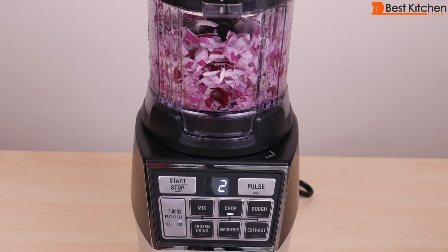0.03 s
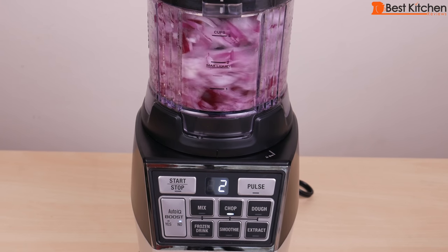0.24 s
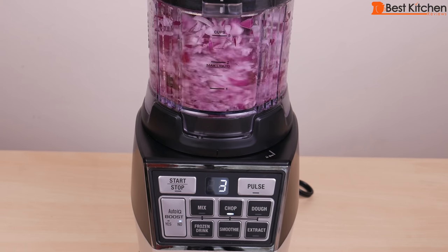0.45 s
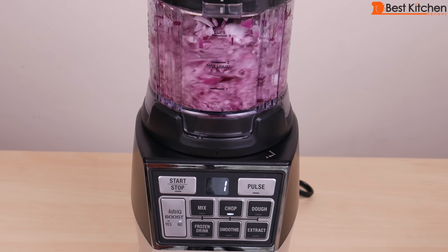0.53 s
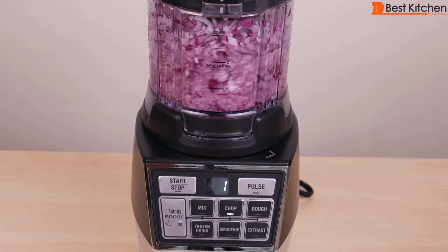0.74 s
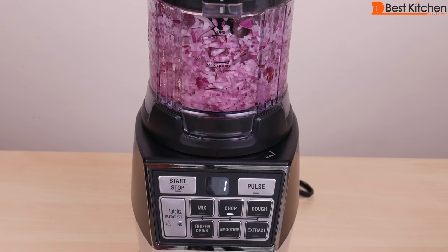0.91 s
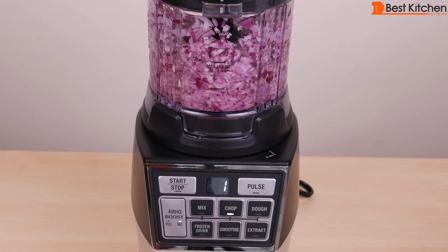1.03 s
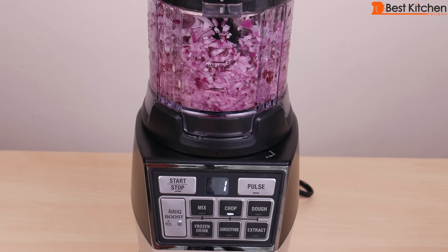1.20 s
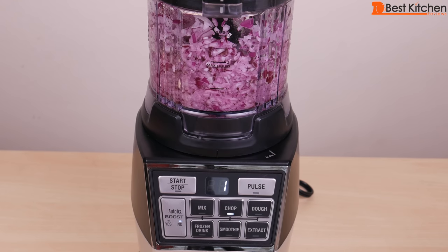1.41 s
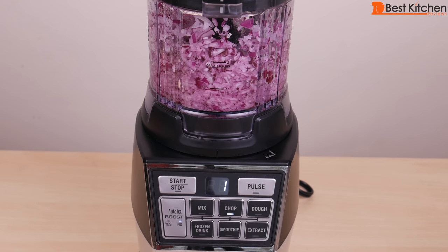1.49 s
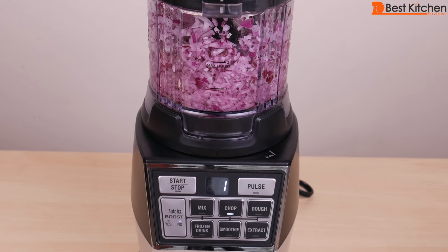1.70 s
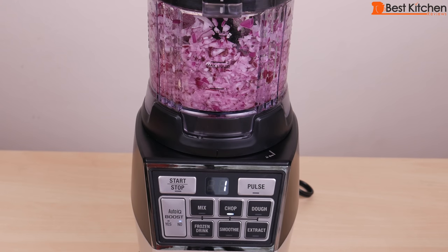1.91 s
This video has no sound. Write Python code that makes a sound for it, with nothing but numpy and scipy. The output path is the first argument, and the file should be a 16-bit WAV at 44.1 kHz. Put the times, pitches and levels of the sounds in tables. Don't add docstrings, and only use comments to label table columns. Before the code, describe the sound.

A kitchen blender makes one pulse. Quiet room air and faint hum, then small relay clicks at 0.18-0.23 seconds. The motor jolts on, big onion pieces thudding on plastic until 0.36; grinding, gear whine and a hail of small knocks peak in pitch near 0.57. It slows, hub ticking at 0.85, stops around 1.0; the base rings briefly in the hard kitchen, then near silence.

```python
import sys
import numpy as np
from scipy import signal
from scipy.fft import rfft, irfft, next_fast_len
from scipy.io import wavfile
from scipy.ndimage import uniform_filter1d, map_coordinates

SR = 44100
rng = np.random.default_rng(int(sys.argv[2]) if len(sys.argv) > 2 else 0)


def persist_wave(psi):
    counts = np.round(np.clip(psi, -1, 1) * 32767).astype(np.int16)
    wavfile.write(sys.argv[1], SR, np.atleast_2d(counts).T)


def nominal_scale(level):
    x = np.asarray(level, float) / 20
    return 10 ** x


N = 85995


def unit(x):
    return x / np.sqrt(np.mean(x ** 2) + 1e-20)


def along(points, hz):
    point_hz, value = np.transpose(points)
    return np.interp(np.log(hz + 1), np.log(point_hz + 1), value)


def wobble(rate):
    return map_coordinates(rng.standard_normal(4000), [np.arange(N) * rate / SR])


def filtered(x, response):
    m = next_fast_len(x.shape[-1] + SR // 2)
    spectrum = rfft(x, m) * response(np.fft.rfftfreq(m, 1 / SR))
    return irfft(spectrum, m)[..., :x.shape[-1]]


def peak(f, hz, width_hz):
    return 1j * f * width_hz / (hz * hz - f * f + 1j * f * width_hz)


def body(modes):
    return lambda f: sum((-1) ** k * nominal_scale(db) * peak(f, hz, width_hz)
                         for k, (hz, width_hz, db) in enumerate(modes))


def paired(pair, alike):
    def mix(hz):
        angle = np.arccos(np.clip(along(alike, hz), -1, 1)) / 2
        return np.array([np.cos(angle), np.sin(angle)])

    mid, side = filtered(pair, mix)
    return np.array([mid + side, mid - side])


def patchy(spectrum, patchy_db, channels=1):
    z = signal.stft(rng.standard_normal((channels, N)), nperseg=512)[2]
    field = uniform_filter1d(rng.standard_normal(z.shape[1:]), 5, 0)
    field = uniform_filter1d(field, 8, 1)
    x = signal.istft(z * nominal_scale(patchy_db * unit(field)), nperseg=512)[1][:, :N]
    return unit(filtered(x, lambda hz: nominal_scale(along(spectrum, hz))))


def bursts(rows):
    t = np.arange(N) / SR
    envelope = sum(nominal_scale(db - 60 * np.abs(t - s) / t60_s) * (t >= s) for s, db, t60_s in rows)
    return rng.standard_normal(N) * envelope


def running():
    # (time [s], shaft speed [Hz], effort [dB])
    motor_course = [
        (0.228, 118, -35.5),
        (.33, 146, -33),
        (0.421, 151.8, -31.5),
        (0.501, 172.9, -33.5),
        (.57, 177.5, -34.5),
        (0.719, 146.6, -33),
        (.84, 131.9, -31),
        (0.919, 114.6, -36.5),
        (0.989, 82.6, -45),
    ]
    on_s, rise_s, stop_s = .2305, 0.0016, 0.069
    t = np.arange(N) / SR
    s, hz, db = np.transpose(motor_course)
    gate = np.clip((t - on_s) / rise_s, 0, 1) * np.exp(-np.clip(t - s[-1], 0, None) / stop_s)
    return np.interp(t, s, hz), nominal_scale(np.interp(t, s, db)) * gate


def motor(speed_hz, effort):
    # (multiple of shaft speed, level [dB], wander rate [1/s], wander depth [dB])
    shaft = [(1, -3.5, 12, 1.2), (2, -10, 18, 2.5), (3.3, -15, 25, 3.5)]
    # (multiple of shaft speed, level [dB], blur [Hz])
    mesh = [(13.5, -12, 180), (27, -18, 300), (54, -32, 400), (64, -29, 1100), (75, -32, 700)]
    # (frequency [Hz], density [dB per Hz])
    grind_spectrum = [(30, -15.5), (100, -17), (200, -1.5), (330, -10), (450, -6.5), (1210, -12.5),
                      (1900, -12), (3000, -23), (6600, -120)]
    # (frequency [Hz], density [dB per Hz])
    fizz_spectrum = [(1400, -20), (2500, -4), (2900, -6), (4700, -10), (7600, -17), (10100, -22),
                     (12800, -33), (14200, -37), (15300, -48), (15600, -120)]
    # (frequency [Hz], width [Hz], level [dB])
    housing = [(313, 25, 2.5), (343.6, 18, 7), (385, 25, 1.5), (591, 40, -0.5), (800, 76, -1.5),
               (1500, 44, 4.5), (1650, 70, 1.5), (1906, 110, 0.5), (2226, 90, 4), (2416, 67, 6),
               (3820, 140, 2.5), (5000, 150, 2.5), (10100, 600, 5.5), (12600, 560, 5)]
    speed_bright_db, unbalance_db = 9, 12
    coast_s, coast_db_per_s = .86, -62
    grind_db, fizz_db, swell_db, gate_share = 0.5, -5.5, 1.2, 0.17
    phase_drift_rad = .3

    turn = 2 * np.pi * np.cumsum(speed_hz) / SR
    bright = nominal_scale(speed_bright_db * np.log2(speed_hz / 150))
    load = nominal_scale(coast_db_per_s * np.clip(np.arange(N) / SR - coast_s, 0, None))

    tones = 0
    for k, db, rate, depth_db in shaft:
        level = nominal_scale(db + depth_db * wobble(rate)) * np.sqrt(2)
        tones = tones + level * np.sin(k * turn + phase_drift_rad * wobble(rate))
    tones = tones * nominal_scale(unbalance_db * np.log2(speed_hz / 160))

    gears = 0
    for k, db, blur_hz in mesh:
        line = wobble(blur_hz) * np.sin(k * turn) + wobble(blur_hz) * np.cos(k * turn)
        gears = gears + nominal_scale(db + 3.04 * wobble(14)) * line

    gate = 1 + gate_share * np.sin(turn + 1.0 * wobble(40.17))
    grind = nominal_scale(grind_db + swell_db * wobble(7.8)) * patchy(grind_spectrum, patchy_db=3.0)[0]
    fizz = nominal_scale(fizz_db + swell_db * wobble(13.88)) * bright * patchy(fizz_spectrum, patchy_db=1.0)[0]

    def shell(f):
        return np.prod([1 + (nominal_scale(db) - 1) * peak(f, hz, width_hz) for hz, width_hz, db in housing], axis=0)

    return effort * tones + filtered(effort * (gears * bright * load + gate * (grind + fizz)), shell)


def pieces(effort):
    # (frequency [Hz], width [Hz], level [dB])
    jar = [(225.2, 150, -1.5), (367.6, 42, 3), (544, 180, -8.5), (792.5, 29, 2.5), (871, 270, -3),
           (1020, 270, -2), (1535, 87, -7), (2300, 370, -28), (3370, 180, -2.5)]
    # (time [s], level [dB])
    jolts = [(.232, -18), (.240, -4), (0.2449, -15.5), (0.248, -5.5), (0.257, -8), (.266, -8), (.274, -5),
             (0.286, -15), (0.317, -23), (0.328, -4.5), (0.357, -13.5)]
    pieces_per_s, pieces_db, spread_db = 500, -12, 1.5
    soft_hz, jolt_db = 1780, 23.5
    ring = body(jar)
    hits = rng.random(N) < pieces_per_s / SR
    hail = hits * nominal_scale(spread_db * rng.exponential(size=N)) * rng.choice([-1, 1], N)
    small = unit(filtered(hail, ring)) * nominal_scale(pieces_db) * effort
    blows = np.zeros(N)
    for s, db in jolts:
        blows[round(s * SR)] = nominal_scale(db + jolt_db)
    return small + filtered(blows, lambda f: ring(f) / (1 + 1j * f / soft_hz) ** 2)


def relay():
    # (time [s], level [dB], ring [Hz], t60 [s], hiss [dB])
    contacts = [
        (0.1811, -57.5, 3340, .06, -2),
        (0.1833, -59.5, 1186, .2, -4.5),
        (.217, -53, 2300, .04, -13.5),
        (.2315, -41, 2860, .06, -20),
    ]
    clicks = np.zeros(N)
    for s, db, hz, t60_s, hiss_db in contacts:
        burst = bursts([(s, db, t60_s)])
        clicks += filtered(burst, lambda f: nominal_scale(hiss_db) * peak(f, 6000, 14000) + 7.1 * peak(f, hz, 900))
    return clicks


def hub():
    # (time [s], level [dB], t60 [s])
    ticks = [
        (.364, -40, .04),
        (.41, -46, .04),
        (.445, -45, .04),
        (.512, -44, .03),
        (.554, -44, .03),
        (.854, -38, .05),
    ]
    # (frequency [Hz], width [Hz], level [dB])
    hub_modes = [(9600, 600, 0), (10300, 900, -2), (11100, 700, -5)]
    return 2 * filtered(bursts(ticks), body(hub_modes))


def settle():
    # (frequency [Hz], level [dB], t60 [s])
    base_modes = [(146, -50, 0.43), (334, -42, 0.36), (460, -44, 0.23), (1460, -55, 0.39)]
    start_s, rise_s = 1, 0.031
    t = np.clip(np.arange(N) / SR - start_s, 0, None)
    ring = 0
    for hz, db, t60_s in base_modes:
        level = nominal_scale(db - 60 * t / t60_s + 1.6 * wobble(21.4))
        ring = ring + level * np.sin(2 * np.pi * hz * t + .4 * wobble(25.05))
    return (1 - np.exp(-t / rise_s)) * ring


def kitchen(x):
    # (frequency [Hz], t60 [s])
    decay = [(100, 1), (400, 0.5), (2000, 0.28), (12000, 0.35)]
    # (frequency [Hz], level [dB])
    wet_level = [(60, -23), (150, -11.5), (350, -9.5), (1400, -6), (2500, -9.5), (4500, -4), (9000, -2),
                 (15000, -0.5)]
    # (frequency [Hz], left-right likeness)
    room_alike = [(60, -.2), (200, .2), (1000, .1), (2500, -.5), (4500, .9), (9000, -.4)]
    hz, t, z = signal.stft(rng.standard_normal((2, SR)), SR, nperseg=256)
    tail = signal.istft(z * nominal_scale(-60 * t / along(decay, hz)[:, None]), SR, nperseg=256)[1]
    tail = tail / np.linalg.norm(tail, axis=1, keepdims=True)
    delayed = np.pad(x, (130, 0))[None]
    wet = signal.fftconvolve(delayed, tail, axes=1)[:, :N]
    return filtered(paired(wet, room_alike), lambda f: nominal_scale(along(wet_level, f)))


def air():
    # (frequency [Hz], density [dB per Hz])
    air_spectrum = [(15, -62.5), (25, -28), (140, -5.5), (220, -6.5), (330, -9.5), (468, -10.5), (646, -16),
                    (719, -17.5), (15400, -43.5)]
    # (frequency [Hz], left-right likeness)
    air_alike = [(60, 0.42), (180, 0.74), (550, 0.09), (1640, -0.43), (4950, 0.17), (14900, 0.4)]
    # (frequency [Hz], width [Hz], level [dB])
    hum_lines = [(138.3, 16, -71), (190, 13, -72), (458.8, 5.1, -74)]
    # (time [s], half length [s], level [dB])
    squeaks = [
        (0.055, .07, -84),
        (1.575, .07, -91),
    ]
    air_db, squeak_hz, squeak_width_hz = -63, 3010, 120

    def narrow(hz, width_hz):
        return unit(filtered(rng.standard_normal((2, N)), lambda f: peak(f, hz, width_hz) ** 2))

    t = np.arange(N) / SR
    hiss = nominal_scale(air_db - 2.0) * paired(patchy(air_spectrum, patchy_db=0.5, channels=2), air_alike)
    hum = sum(nominal_scale(db) * paired(narrow(hz, width_hz), air_alike) for hz, width_hz, db in hum_lines)
    swell = sum(nominal_scale(db) * np.exp(-((t - s) / half_s) ** 4) for s, half_s, db in squeaks)
    return hiss + hum + swell * narrow(squeak_hz, squeak_width_hz)


def shaped(x):
    low_cut_hz = 115
    notch_hz, notch_width_hz, notch_depth = 7960, 260, 0.92

    def response(f):
        notch = 1 - notch_depth * peak(f, notch_hz, notch_width_hz)
        return notch / (1 + low_cut_hz / (1j * f + 1e-3)) ** 3

    return filtered(x, response)


def scene():
    balance_db = -0.25
    speed_hz, effort = running()
    near = shaped(motor(speed_hz, effort) + pieces(effort) + relay() + hub())
    direct = near * nominal_scale([[balance_db], [-balance_db]])
    return direct + settle() + kitchen(near) + air()


def top_cut(x):
    return signal.sosfilt(signal.butter(12, 15530, fs=SR, output="sos"), x)


def record(dry):
    top_hz = 15400
    mix = filtered(dry, lambda f: f < top_hz)
    return top_cut(mix)


dry = scene()
out = record(dry)
persist_wave(out)
```